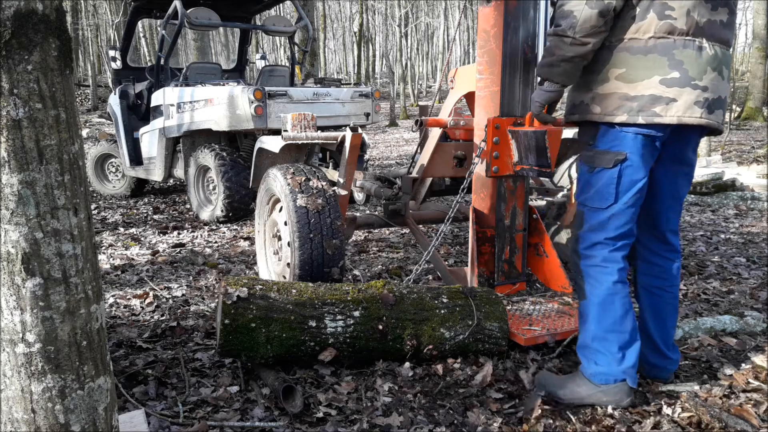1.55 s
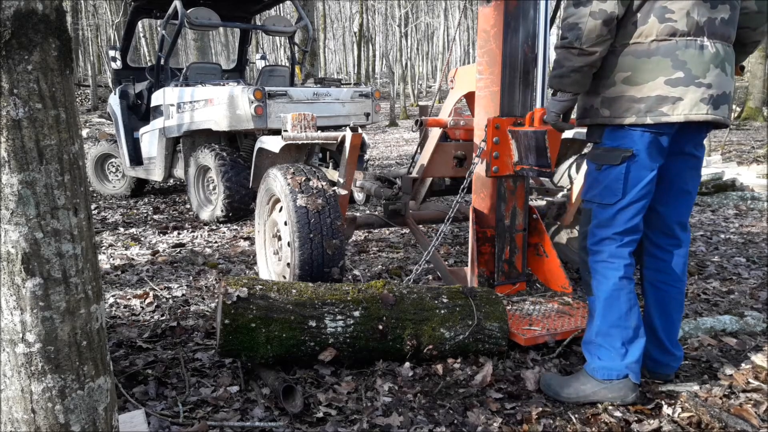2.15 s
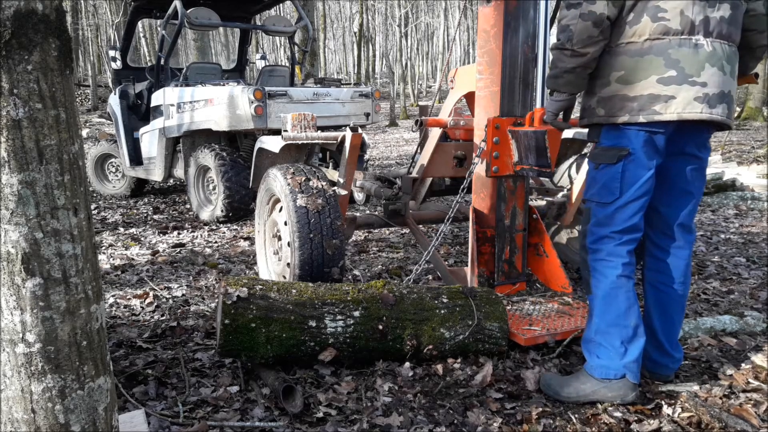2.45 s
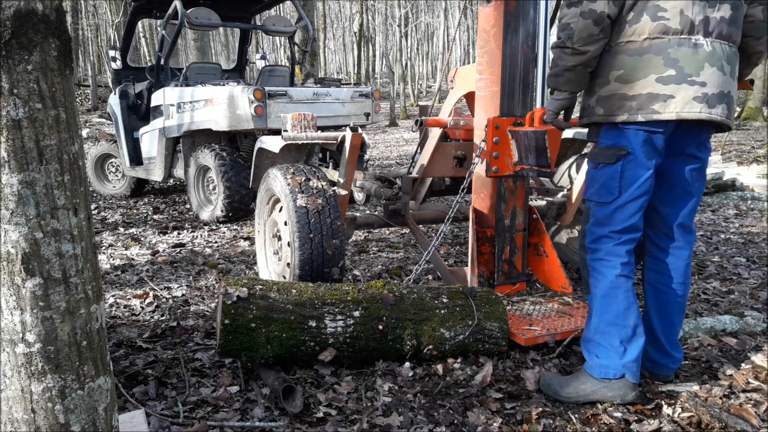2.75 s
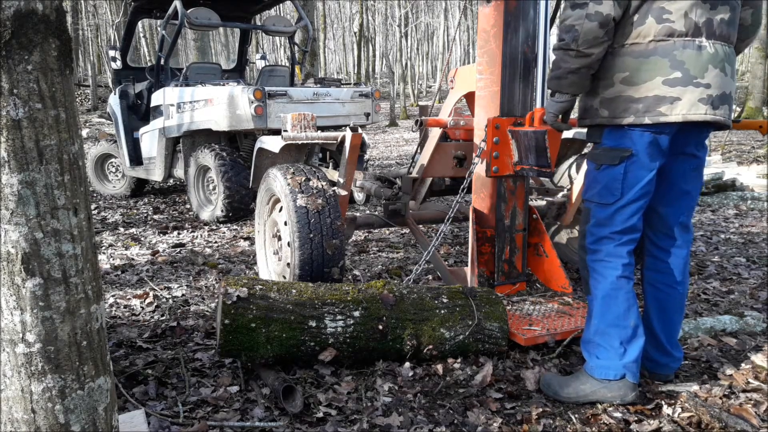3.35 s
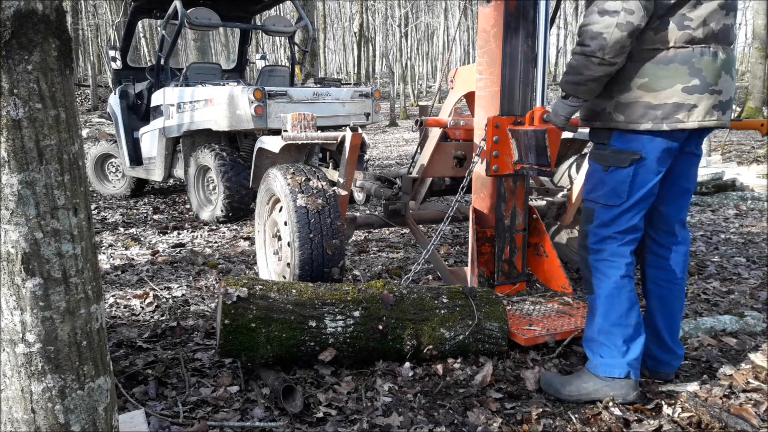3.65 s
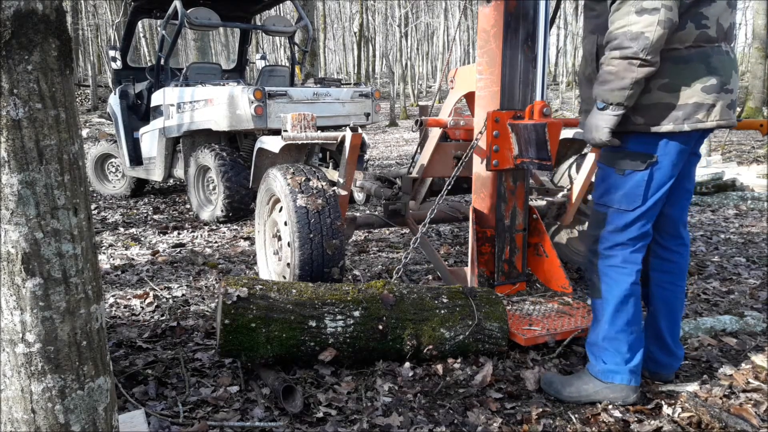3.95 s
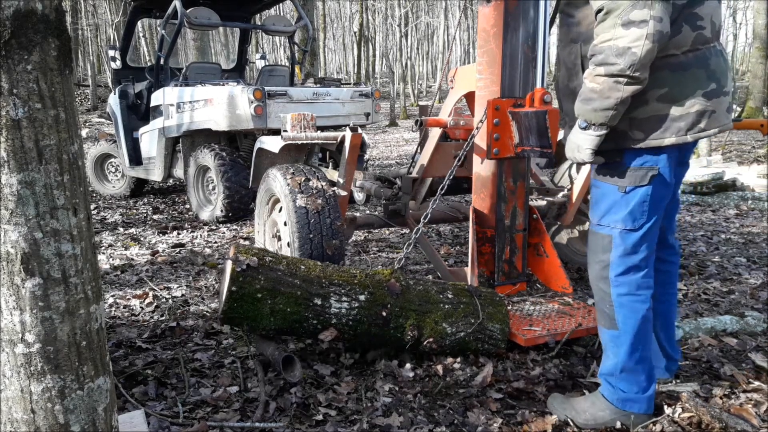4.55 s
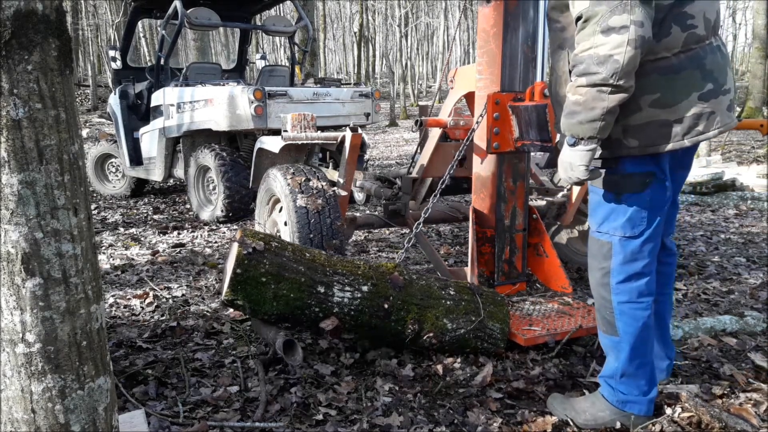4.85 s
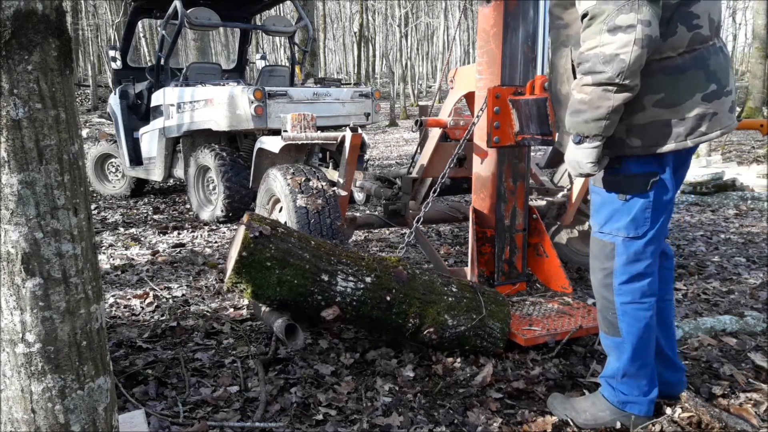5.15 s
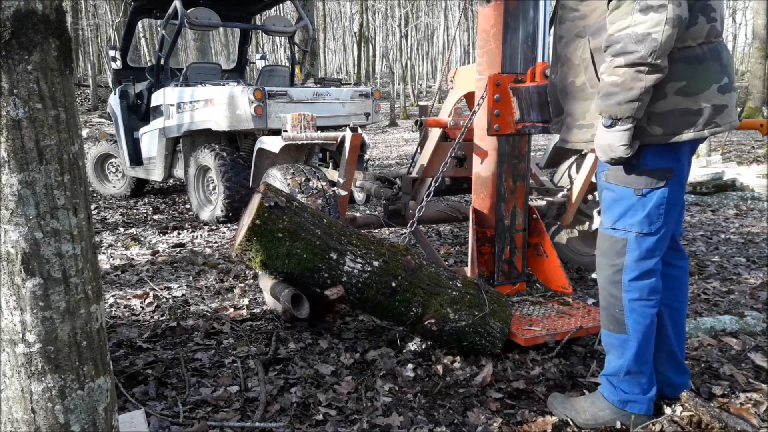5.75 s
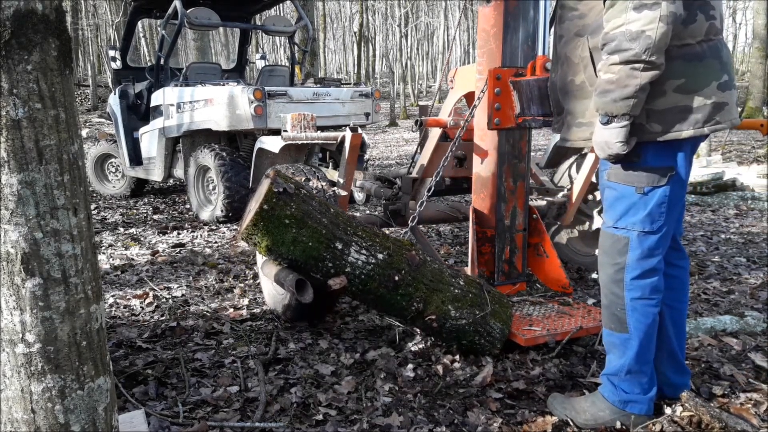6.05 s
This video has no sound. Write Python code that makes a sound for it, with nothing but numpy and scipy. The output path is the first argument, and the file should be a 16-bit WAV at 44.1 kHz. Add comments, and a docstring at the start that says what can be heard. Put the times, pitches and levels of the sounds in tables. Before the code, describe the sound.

In a wood, a log splitter's petrol engine runs with a fast, even beat, a metallic clatter and a steady hydraulic whine, with a little wind rumble on the microphone. A few light chain knocks come before the engine suddenly dips under load. The chain snaps tight with one louder clank, the whine roughens, and the exhaust rasps in quick swells as the engine speed swings up and down and begins to settle.

```python
"""Log splitter in a wood

A one-cylinder, four-stroke petrol engine throbs and clatters evenly, driving a whining oil pump.
Then the arm takes up its chain with a clank and lifts a log. The engine sags, its speed control
overshoots back and forth, and the exhaust rasps each time the engine pulls itself back up."""
import sys
import numpy as np
from scipy import signal
from scipy.fft import rfft, irfft, next_fast_len
from scipy.io import wavfile
from scipy.ndimage import uniform_filter1d

SR = 44100
rng = np.random.default_rng(int(sys.argv[2]) if len(sys.argv) > 2 else 0)


def transcribe(signal):
    """Save signal, clipped to [-1, 1], as a 16-bit WAV file at the path in sys.argv[1]."""
    frames = np.atleast_2d(signal).T
    limited = np.clip(frames, -1, 1)
    pcm = np.round(limited * 32767).astype(np.int16)
    wavfile.write(sys.argv[1], SR, pcm)


N = 273860
TIME = np.arange(N) / SR
FFT_SIZE = next_fast_len(N + SR // 4, True)
FFT_HZ = np.fft.rfftfreq(FFT_SIZE, 1 / SR)
# One engine cycle is two turns of the crankshaft. A "place" in the cycle runs from 0 to 1.
FIRES, EXHAUST_OPENS, INTAKE_OPENS = .1286, .475, .72


def amp(db):
    """Turns decibels into a number to multiply by."""
    return 10 ** (np.asarray(db) / 20)


def unit(x):
    """Scales a signal to an average power of 1."""
    return x / np.sqrt(np.mean(x ** 2) + 1e-20)


def curve(rows, at=TIME):
    """Joins the (time, value) points of a table with straight lines."""
    return np.interp(at, *np.transpose(rows))


def colour(x, spectrum):
    """Makes each frequency louder or softer, following a (frequency, level) table."""
    hz, db = np.transpose(spectrum)
    gain = amp(np.interp(np.log(FFT_HZ + 1), np.log(hz), db))
    return irfft(rfft(x, FFT_SIZE) * gain, FFT_SIZE)[:N]


def drift(rate_hz):
    """A smooth random wobble, mostly slower than the given rate."""
    coarse = np.linspace(0, N / SR, 8192)
    hz = np.fft.rfftfreq(len(coarse), coarse[1])
    slow = irfft(rfft(rng.standard_normal(len(coarse))) / (1 + (hz / rate_hz) ** 4))
    return unit(np.interp(TIME, coarse, slow))


def ring(x, notes):
    """Makes an object ring: each note swells briefly, then dies, sooner the greater its width."""
    t = np.arange(SR // 8) / SR
    body = sum(amp(db) * (np.pi * width) ** 2 * t * np.exp(-np.pi * width * t)
               * np.cos(2 * np.pi * hz * t) for hz, width, db in notes)
    return signal.oaconvolve(x, 2 * body / SR)[:N]


def scatter(x, echo_db, decay_s):
    """Sound bounces off the machine and the ground as many weak echoes."""
    t = np.arange(SR // 8) / SR
    bounces = rng.standard_normal(len(t)) * np.exp(-t / decay_s) * (t > .002)
    echoes = signal.oaconvolve(x, bounces / np.linalg.norm(bounces))[:N]
    return (x + amp(echo_db) * echoes) / np.sqrt(1 + amp(echo_db) ** 2)


def crank_tone(cycles, multiple, waver):
    """A tone that follows the engine's speed, wavering a little ahead and behind."""
    return np.cos(2 * np.pi * multiple * cycles + waver * drift(rate_hz=17.7))


# Gusts of wind: (middle time [s], half length [s], level [dB])
GUSTS = [(.22, 0.09, -33), (.44, 0.066, -29)]

def breeze(steady_db=-51):
    """A light breeze and its gusts rumble on the microphone."""
    gusts = sum(amp(db) * np.exp(-((TIME - middle) / half) ** 2) for middle, half, db in GUSTS)
    rumble = colour(rng.standard_normal(N), [(20, 8), (90, 1), (160, -18), (400, -45), (2000, -80)])
    return (amp(steady_db) + gusts) * unit(rumble)


# Echoes off the vehicle and nearby trunks: (delay [s], relative level [dB])
ECHOES = [(.0075, -15.5), (0.0221, -13)]

def nearby_echoes(x):
    """Late, quiet copies of a sound soften the gaps between its beats."""
    return sum(amp(db) * np.interp(TIME - delay, TIME, x, left=0) for delay, db in ECHOES)


def oil_valve(hz=357, start_s=3.81, length_s=.24, fade_s=.03, level_db=-33.5):
    """Oil forced through the opening valve sings one short note."""
    age = TIME - start_s
    held = np.clip(np.minimum(age, length_s - age) / fade_s, 0, 1)
    return amp(level_db) * held * np.sin(2 * np.pi * hz * TIME + .3 * drift(rate_hz=13))


# Knocks of the chain and arm: (time [s], relative level [dB], fade time [s])
KNOCKS = [(.168, -31, .01), (3.058, -24.5, 0.015), (3.246, -28, 0.037), (3.749, -26, 0.015),
          (4.093, -17, 0.02), (4.106, -21, 0.008)]
# Tone of the rattling chain: (frequency [Hz], relative level [dB])
CHAIN_TONE = [(60, -26), (150, -11), (330, -7), (490, 1), (700, -2), (1100, 0), (1550, -1), (2100, -10),
              (5000, -24), (16000, -42)]
# Ringing notes of the steel arm: (frequency [Hz], width [Hz], relative level [dB])
ARM_NOTES = [(190, 160, -1), (490, 110, 3), (720, 100, -3), (930, 90, -4), (1080, 90, -1), (1230, 90, -5),
             (1530, 70, -3.5), (2020, 60, -5.5)]

def chain_knocks(rise_s=.0013):
    """The chain snaps tight and rattles, ringing the steel arm."""
    blows = sum(amp(db) * np.clip((TIME - start) / rise_s, 0, 1) * np.exp(-abs(TIME - start) / fade)
                for start, db, fade in KNOCKS)
    rattle = rng.standard_normal(N)
    chain = amp(2.5) * blows * unit(colour(rattle, CHAIN_TONE))
    return chain + amp(14) * ring(blows * rattle, ARM_NOTES)


# Tones of the pump's gears: (vibrations per cycle [count], relative level [dB], waver [radians])
GEAR_TONES = [(42, -7, .7), (44, -8, 1.1), (46, -5, .9), (48, 0, .4), (50, -9, .8)]
# What the pump's case lets through: (frequency [Hz], relative level [dB])
PUMP_CASE = [(600, -41), (670, -3), (705, 2), (810, 1.5), (840, 1), (875, -39), (1000, -44)]
# Loudness of the whine, easing as the log tips up: (time [s], relative level [dB])
WHINE_LEVEL = [(0, -29.5), (2.7, -27.5), (3.73, -28.5), (3.8, -22), (3.95, -26.5), (4.2, -23), (6.21, -27)]

def pump_whine(cycles, evenness=.37, free_throb_db=1.5, loaded_throb_db=2.5):
    """The gears sing through the pump's case and throb with the crank; load roughens them."""
    load = load_at(TIME)
    gears = sum(amp(db) * crank_tone(cycles, k, waver + .8 * load) for k, db, waver in GEAR_TONES)
    churn = (5.8 + 7.9 * load) * rng.standard_normal(N)
    whine = colour(gears + churn, PUMP_CASE)
    # the pump moves the same oil every turn, so its loudness stays fairly even
    power = abs(uniform_filter1d(whine ** 2, size=350)) + 1e-6
    whine = whine / power ** (evenness / 2)
    whine = whine / np.sqrt(uniform_filter1d(whine ** 2, size=5000))  # flattens slow random swells
    free_db = free_throb_db * np.cos(8 * np.pi * (cycles - .27))  # twice a crank turn
    loaded_db = loaded_throb_db * np.cos(4 * np.pi * (cycles - .28))  # once a crank turn
    return whine * amp(curve(WHINE_LEVEL) + (1 - load) * free_db + load * loaded_db - .05)


# Ringing note of the loose tappet: (frequency [Hz], width [Hz], relative level [dB])
TICK_NOTE = [(4900, 830, 0)]

def tappet_tick(cycles, speed, place=.78, level_db=-51, decay_s=.0094):
    """A tappet, the part that pushes an engine valve, is loose and ticks brightly once a cycle."""
    age = ((cycles - place) % 1) / speed
    taps = rng.standard_normal(N) * np.exp(-age / decay_s)
    return amp(level_db) * unit(ring(taps, TICK_NOTE))


# Tones of the case around the crank: (vibrations per cycle [count], relative level [dB])
HUM_TONES = [(14, -45), (16, -45), (24, -38), (25, -39.5), (28, -40.5), (30, -42), (32, -45), (34, -48)]

def crankcase_hum(cycles):
    """The engine's case hums cleanly when running free; under load the hum blurs and gets softer."""
    load = load_at(TIME)
    tones = sum(amp(db) * crank_tone(cycles, k, waver=.08 + load) for k, db in HUM_TONES)
    return amp(-.6 - 11 * load) * tones


# Valve movements that thicken the clatter: (place in the cycle [0-1], boost with no load [dB])
VALVE_MOVES = [(.02, 1), (.6, 3), (.85, 5)]
# Tone of the clatter: (frequency [Hz], relative level [dB])
CLATTER_TONE = [(40, -14), (80, -2.5), (240, 2), (360, -1.5), (620, 4.5), (950, 1), (1300, -1),
                (2000, -2.5), (3000, -5.5), (3800, -12), (5700, -18), (7200, -10.5), (8100, -27),
                (11500, -26.5), (16000, -37)]
# Ringing notes of the covers and cooling fins: (frequency [Hz], width [Hz], relative level [dB])
COVER_NOTES = [(928, 180, -1.5), (1216, 23, 7.5), (1733, 55, -3.5), (1850, 72, -1.5), (1996, 140, -6),
               (3033, 76, -8)]
# Loudness of the clatter: (time [s], level [dB])
CLATTER_LEVEL = [(0, -31), (3.3, -28), (6.21, -27.5)]

def clatter(cycles, move_width_cycles=.09, load_loss=.3):
    """Tiny ticks from the valve parts and fan ring the covers, most strongly while the valves move."""
    grain = rng.standard_normal(N) * amp(.78 * drift(rate_hz=680))
    flicker_db = .5 * drift(rate_hz=20)
    boost_db = sum(db * np.exp(-(((cycles - place + .5) % 1 - .5) / move_width_cycles) ** 2)
                   for place, db in VALVE_MOVES)
    ticks = grain * amp(boost_db * (1 - load_loss * load_at(TIME)) + flicker_db)
    metal = colour(ticks, CLATTER_TONE) + amp(-3.5) * ring(ticks, COVER_NOTES)
    return unit(scatter(metal, echo_db=-12, decay_s=.0027)) * amp(curve(CLATTER_LEVEL))


# Tone of the rushing exhaust gas: (frequency [Hz], relative level [dB])
GAS_TONE = [(150, 13.5), (500, 0.5), (1000, 1), (1400, 2.5), (1850, 7.5), (2600, 0), (4000, -3),
            (5500, -5.5), (7000, 5), (8200, -8.5), (12000, -5.5), (16000, -8.5)]

def exhaust_rasp(cycles, speed, throttle, rise_s=.0041, bright_decay_s=.014, dull_decay_s=.028):
    """Gas bursts out as hard as the throttle is open; the silencer holds the lower part longer."""
    lead_cycles = .029  # the hiss starts just before the main push
    age = ((cycles - EXHAUST_OPENS + lead_cycles) % 1) / speed
    opening = np.interp(TIME - age, TIME, throttle)
    burst = amp(-12.5) * opening * (1 - np.exp(-(age / rise_s) ** 2))
    gas = unit(colour(rng.standard_normal(N), GAS_TONE))
    dull = signal.sosfiltfilt(signal.butter(2, 5500, fs=SR, output="sos"), gas)
    bright = gas - dull
    puffs = burst * (dull * np.exp(-age / dull_decay_s) + bright * np.exp(-age / bright_decay_s))
    return scatter(puffs, echo_db=-13, decay_s=.01)


# The load comes on as the oil valve opens: (time [s], load [0-1])
LOAD = [(3.68, 0.05), (3.82, 0.9)]

def load_at(times):
    """How hard the pump makes the engine work at the given times."""
    return curve(LOAD, times)


# Average engine speed, sagging as the load comes on: (time [s], speed [cycles per second])
SPEED = [(0, 16.736), (3.696, 16.775), (3.895, 14.333), (4.026, 15.777), (6.21, 15.982)]

def speed_control(swing_from_s=4.026, swings_per_s=3.267, swing_size_hz=.807, settle_s=1.704):
    """The speed overshoots and slowly settles; the throttle opens under load and to speed up."""
    since = np.maximum(TIME - swing_from_s, 0)
    swing = swing_size_hz * np.exp(-since / settle_s) * np.sin(2 * np.pi * swings_per_s * since)
    speed = curve(SPEED) + swing
    lag_s, hard_pull_hz_per_s = .018, 11.4
    speeding_up = np.interp(TIME - lag_s, TIME, np.gradient(speed) * SR)
    pull = np.tanh(speeding_up / hard_pull_hz_per_s)
    throttle = np.clip(.065 + load_at(TIME) * (.43 + .37 * pull), 0, 1)  # 0 is shut, 1 is wide open
    return speed, throttle


def strokes(cycles, place, loaded_db, unevenness, jitter):
    """One push a cycle; its strength and timing get a little less even under load."""
    times = np.interp(np.arange(int(cycles[-1] - place) + 1) + place, cycles, TIME)
    load = load_at(times)
    size, late = rng.standard_normal((len(times), 2)).T
    times = times + jitter * (.03 + .6 * load) * late
    samples = np.clip(np.round(times * SR).astype(int), 0, N - 1)
    push = amp(loaded_db * load + unevenness * (.3 + .3 * load) * size)
    return np.bincount(samples, push, N) * N / cycles[-1] / 2


# Ringing notes of the silencer, air box and frame: (frequency [Hz], width [Hz], relative level [dB])
SILENCER_NOTES = [(87.7, 66, -35), (126.4, 41, -30), (315, 87, -41.5), (405.5, 123, -42.5), (469, 23, -42)]
AIR_BOX_NOTES = [(84, 81, -33), (183, 51, -37.5), (290, 102, -45), (393.6, 51, -47.5)]
FRAME_NOTES = [(90, 106, -35.5), (163, 120, -40), (280, 130, -46)]

def engine_throb(cycles, free_shake=.33):
    """The exhaust pushes, the intake sucks, and each firing shakes the frame, harder under load."""
    pushes = strokes(cycles, EXHAUST_OPENS, loaded_db=-3.5, unevenness=.5, jitter=.0004)
    gulps = strokes(cycles, INTAKE_OPENS, loaded_db=-.2, unevenness=1.2, jitter=.0006)
    firings = strokes(cycles, FIRES, loaded_db=1.7, unevenness=-1, jitter=.0016)
    exhaust = amp(1.02) * ring(pushes, SILENCER_NOTES)
    intake = amp(1.74) * ring(gulps, AIR_BOX_NOTES)
    frame = (free_shake + (1 - free_shake) * load_at(TIME)) * ring(firings, FRAME_NOTES)
    bass_cut = signal.butter(1, 55, "high", fs=SR)  # small openings give off little deep bass
    return signal.lfilter(*bass_cut, signal.lfilter(*bass_cut, intake - exhaust + frame))


def scene(wander_cycles=.006):
    """The crank, drifting slightly, times the engine and pump; valve, chain and breeze join them."""
    speed, throttle = speed_control()
    cycles = np.cumsum(speed) / SR + wander_cycles * drift(rate_hz=2.55)  # engine cycles so far
    beat = engine_throb(cycles)
    engine = amp(-.88) * (beat + nearby_echoes(beat)) + crankcase_hum(cycles) + clatter(cycles)
    engine += exhaust_rasp(cycles, speed, throttle) + tappet_tick(cycles, speed)
    return (engine + pump_whine(cycles) + oil_valve() + chain_knocks() + breeze())[None]


def record(dry, lowest_hz=55, highest_hz=16100):
    """A small microphone loses the deep bass, and the very highest treble is cut off."""
    thin = signal.sosfiltfilt(signal.butter(3, lowest_hz, "high", fs=SR, output="sos"), dry)
    treble_cut = signal.firwin(511, highest_hz, window=("kaiser", 9), fs=SR)
    return signal.oaconvolve(thin, treble_cut[None], "same")


dry = scene()
out = record(dry)
transcribe(out)
```